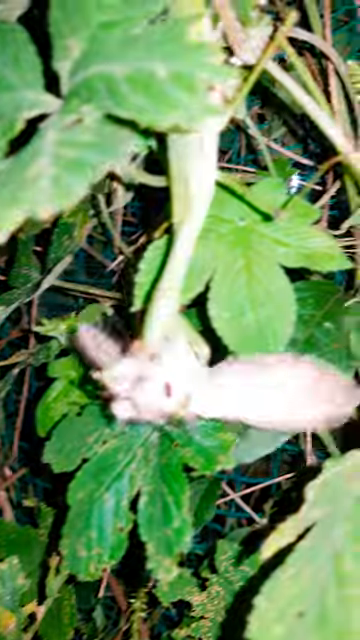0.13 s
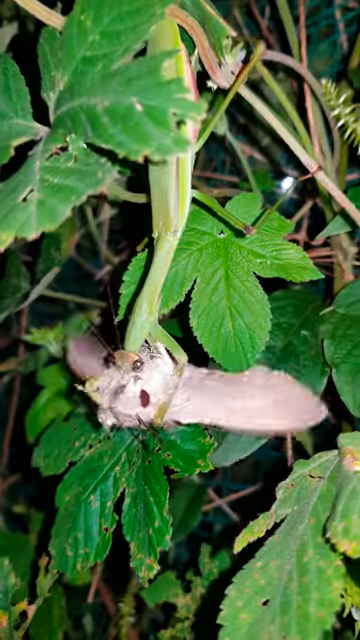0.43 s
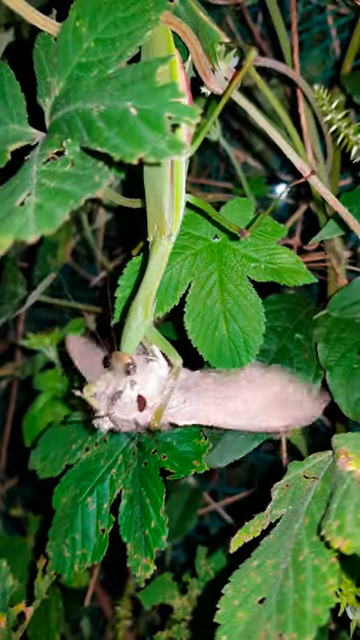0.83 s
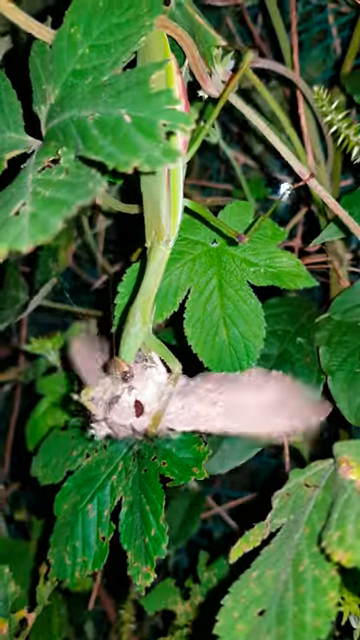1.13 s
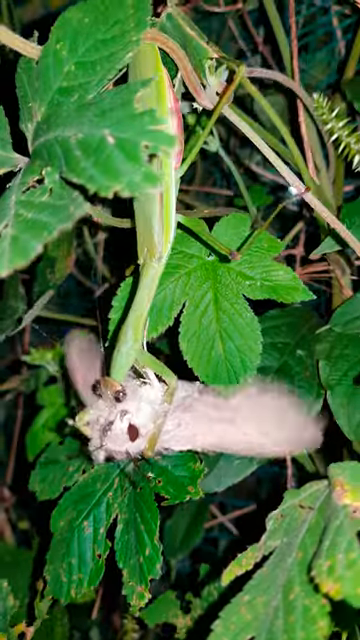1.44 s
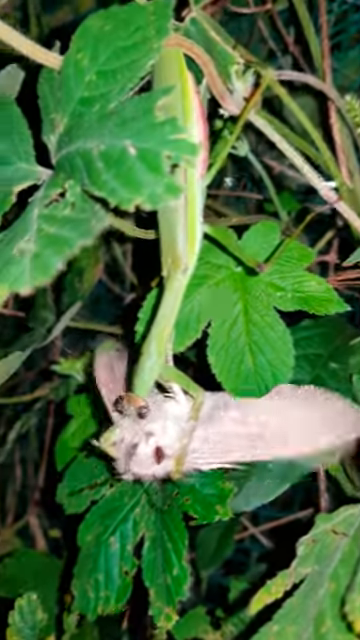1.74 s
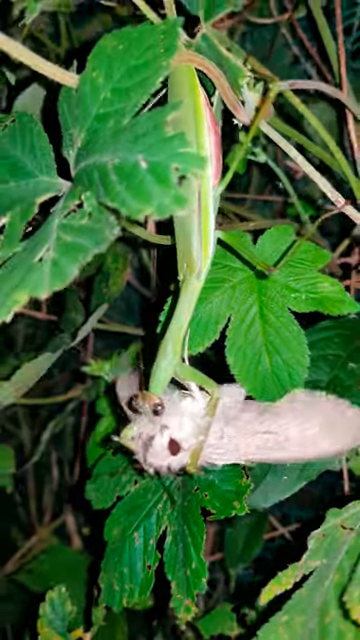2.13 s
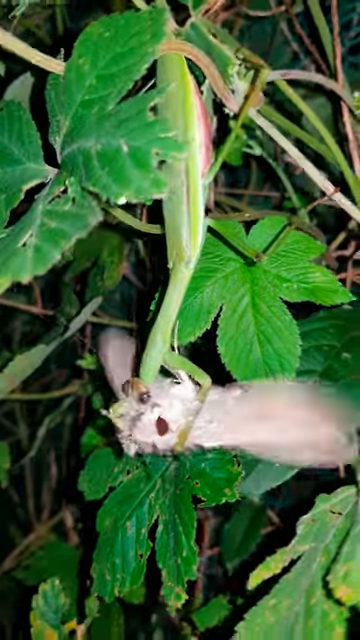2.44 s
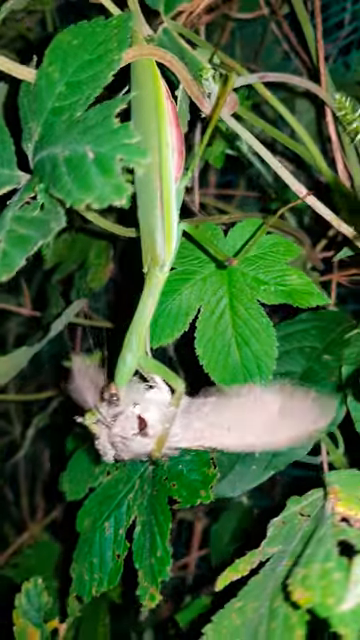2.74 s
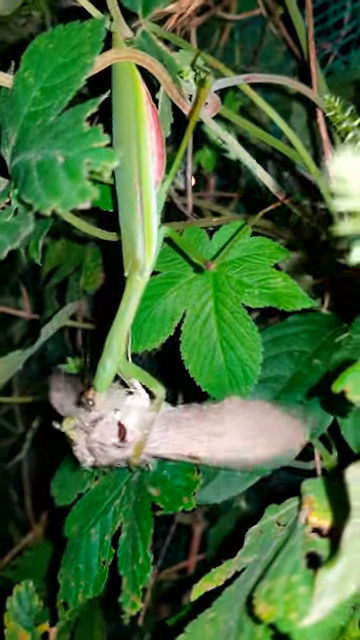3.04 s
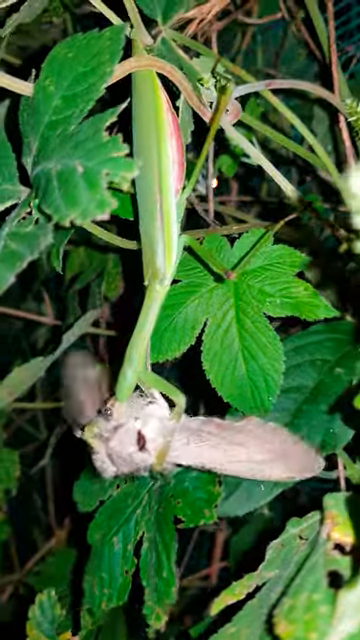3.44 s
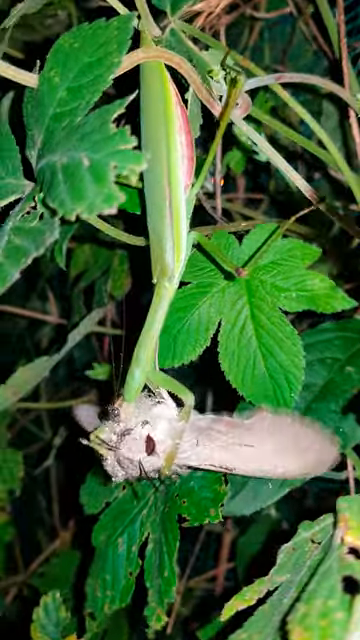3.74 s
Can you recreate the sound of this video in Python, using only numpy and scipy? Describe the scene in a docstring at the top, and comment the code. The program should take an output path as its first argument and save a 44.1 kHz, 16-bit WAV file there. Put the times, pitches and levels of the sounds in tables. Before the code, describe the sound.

A continuous bright insect chorus outdoors: a fast high trill, short chirps in groups, dry rasps and ticking, leaning slightly left with hiss on the right, over a far-off engine wavering in pitch and rising road rumble.

```python
"""Crickets trill and chirp in dense undergrowth at night, each wing stroke a short falling whistle scattered by leaves.
A field cricket slurs longer falling notes; bush crickets buzz, rasp, tick and hiss as shaped noise.
Behind them a far chorus shimmers as two bands of noise with sparse far chirps.
A distant engine, a stack of gliding overtones, rises and falls in pitch while its road noise slowly grows."""
import sys
import numpy as np
from scipy import signal
from scipy.fft import rfft, irfft, next_fast_len
from scipy.io import wavfile
from scipy.ndimage import map_coordinates

SR = 44100
rng = np.random.default_rng(int(sys.argv[2]) if len(sys.argv) > 2 else 0)


def unload_audio(sound):
    """Save the sound as a 16-bit wav file, at the path given as the first command line argument."""
    columns = np.transpose(np.atleast_2d(sound))
    # keep every value between -1 and 1, then stretch to whole-number steps
    steps = np.round(np.clip(columns, -1, 1) * 32767)
    wavfile.write(sys.argv[1], SR, steps.astype(np.int16))


N = 171990


def amp(db):
    """Decibels to gain."""
    return 10 ** (np.asarray(db) / 20)


def unit(x):
    """Scale to rms 1."""
    return x / np.sqrt(np.mean(x ** 2) + 1e-20)


def along(points, hz):
    """Read (Hz, value) points on a log frequency axis."""
    f, v = np.transpose(points)
    return np.interp(np.log(hz + 1), np.log(f + 1), v)


def curves(rows):
    """One value per sample for each column after the time."""
    s, *columns = np.transpose(rows)
    return [np.interp(np.arange(N) / SR, s, column) for column in columns]


def wobble(rate):
    """A smooth random curve, rate knots a second."""
    knots = np.linspace(0, N / SR * rate, 4000)
    coarse = map_coordinates(rng.standard_normal(2048), [knots], mode="wrap")
    return np.interp(np.arange(N), np.linspace(0, N, len(knots)), coarse)


def filtered(x, response):
    """Shape the spectrum of x with a response of frequency."""
    m = next_fast_len(N + SR // 4)
    return irfft(rfft(x, m) * response(np.fft.rfftfreq(m, 1 / SR)), m)[..., :N]


def pan(db):
    """Gains of left and right, the left louder by db."""
    return unit(amp([[db / 2], [-db / 2]]))


# How alike left and right are. Each row: frequency in Hz, correlation from 0 to 1 (no unit).
STEREO_LIKENESS = [(100, .99), (300, .95), (600, .93), (1000, .7), (2000, .05), (4000, 0)]


def coloured_noise(spectrum):
    """Stereo noise of rms 1: mid and side shares make it near mono in the bass and wide in the treble."""
    def turn(hz):
        return np.arccos(np.clip(along(STEREO_LIKENESS, hz), -1, 1)) / 2

    def mid_side_response(hz):
        return amp(along(spectrum, hz)) * [np.cos(turn(hz)), np.sin(turn(hz))]

    mid, side = filtered(rng.standard_normal((2, N)), mid_side_response)
    return unit(np.array([mid + side, mid - side]))


def add(track, s, sound):
    """Mix a sound in, centred on time s."""
    i = round(s * SR) - len(sound) // 2
    a, b = max(i, 0), min(i + len(sound), N)
    if b > a:
        track[a:b] += sound[a - i:b - i]


def bursts(rows, length_s):
    """A smooth swell for each (s, dB) row."""
    x = np.zeros(N)
    for s, db in rows:
        add(x, s, amp(db) * np.hanning(int(length_s * SR)))
    return x


def stroke(length_s, from_hz, to_hz, dwell=0):
    """One wing closure: a falling whistle that can dwell on the wing's resonance halfway down."""
    u = np.linspace(-1, 1, max(int(length_s * SR), 8))
    glide = (1 - dwell) * u + dwell * u ** 3
    hz = (from_hz + to_hz) / 2 + (to_hz - from_hz) / 2 * glide
    whistle = np.sin(2 * np.pi * (np.cumsum(hz) / SR + rng.random()))
    return np.cos(np.pi * u / 2) * whistle


LEAVES_T60_S, RIGHT_LAG_S = .13, .00003


def leaves(x, scatter_db):
    """Direct sound, slightly later on the right, plus a short foliage scatter: a slow fade through three noise tails."""
    t = np.arange(SR // 5) / SR
    tails = rng.standard_normal((3, 2, len(t))) * amp(-60 * t / LEAVES_T60_S)
    tails /= np.linalg.norm(tails, axis=-1, keepdims=True)
    place = np.linspace(0, len(tails) - 1, N)
    scatter = np.zeros((2, N))
    for k, tail in enumerate(tails):
        fade = np.sqrt(np.clip(1 - abs(place - k), 0, 1))
        scatter += signal.oaconvolve(x[None], tail, axes=1)[:, :N] * fade
    right = filtered(x, lambda hz: np.exp(-2j * np.pi * hz * RIGHT_LAG_S))
    direct = np.array([x, right])
    return (direct + amp(scatter_db) * scatter) / np.hypot(1, amp(scatter_db))


# Engine pitch. Each row: time in seconds, firing rate in Hz.
FIRING = [(.1, 50), (.3, 55), (.5, 62), (.8, 66), (1.25, 68), (1.55, 76), (1.78, 80), (2, 75), (2.3, 66),
          (2.55, 67), (2.9, 73), (3.28, 78), (3.5, 70), (3.7, 61), (3.9, 60)]
# Engine loudness before trim. Each row: time in seconds, level in dB.
ENGINE_LEVEL = [(.1, -58), (.4, -48), (.7, -44.5), (1.1, -45), (1.35, -43), (2, -43.5), (2.33, -39.5),
                (2.6, -44), (2.85, -44), (3.05, -40.5), (3.45, -44), (3.65, -41.5), (3.9, -44)]
# Lift of the upper overtones. Each row: time in seconds, relative level in dB.
UPPER_OVERTONES = [(.1, 4), (1.8, 3.5), (2.2, -4), (2.8, -2), (3.25, 2.5), (3.7, -5)]
# Fixed exhaust resonances. Each row: frequency in Hz, relative level in dB.
EXHAUST = [(80, -1.5), (120, -13), (160, -17), (205, -13), (290, -22), (375, -18), (470, -32), (560, -22),
           (630, -27), (720, -17), (780, -24), (875, -14.5), (940, -32), (1100, -45)]


def engine(count=14, order=6):
    """Overtones of the firing rate glide through fixed exhaust resonances; those above order have their own level."""
    (firing_hz,), (level_db,), (upper_db,) = curves(FIRING), curves(ENGINE_LEVEL), curves(UPPER_OVERTONES)
    phase = 2 * np.pi * np.cumsum(firing_hz) / SR + .05 * wobble(25)
    drone = np.zeros(N)
    for k in range(1, count + 1):
        overtone_db = along(EXHAUST, k * firing_hz) + upper_db * (k > order) + .5 * np.sqrt(k) * wobble(7)
        drone += amp(overtone_db) * unit(np.sin(k * phase + 2 * np.pi * rng.random()))
    return amp(level_db + .3) * drone


# Road loudness before trim. Each row: time in seconds, rumble in dB, roar in dB, tyres in dB.
ROAD = [(.1, -52, -57, -73), (.35, -50, -54, -69), (1.1, -49, -53, -64), (1.7, -45.5, -51.5, -61),
        (2.3, -44, -52, -57.5), (2.7, -44.5, -52, -57.5), (3.2, -43, -49.5, -55), (3.6, -41.5, -48, -53.5),
        (3.9, -40.5, -48.5, -53.5)]
# Colours of the three road layers. Each row: frequency in Hz, relative level in dB.
RUMBLE = [(15, -20), (30, -6), (60, -2), (110, 1), (160, -1), (225, 2), (300, -3), (385, -4), (480, -13),
          (800, -35)]
ROAR = [(250, -30), (450, -6), (560, -2), (700, 0), (860, 0), (980, -6), (1250, -10), (1500, -22),
        (2000, -45)]
TYRES = [(600, -25), (1100, 3), (1350, 1), (1750, -.5), (2250, -4), (3100, -11), (5000, -18), (10000, -35)]


def road_noise():
    """Three growing noise bands: low rumble, mid roar and fluttering tyres."""
    rumble_db, roar_db, tyre_db = curves(ROAD)
    rumble = amp(rumble_db + .8) * coloured_noise(RUMBLE)
    roar = amp(roar_db - .8) * coloured_noise(ROAR)
    tyres = amp(tyre_db + 1.5 + .8 * wobble(45)) * pan(db=1.6) * coloured_noise(TYRES)
    return rumble + roar + tyres


def vehicle():
    """A distant engine's drone in its road noise, a little to the left."""
    return pan(db=1.5) * (engine() + road_noise())


# Colours of the low and high chorus. Each row: frequency in Hz, relative level in dB.
FAR_LOW = [(2200, -45), (2480, -22), (2650, -6), (2850, -28), (3150, -32), (3600, -8), (4000, -7),
           (4400, -1), (4750, 0), (5150, -8), (5600, -19), (7000, -40)]
FAR_HIGH = [(4500, -45), (5700, -23), (6200, -13), (6650, -4), (7100, 0), (7450, -5), (7900, -11),
            (8500, -16), (9100, -23), (9700, -31), (11500, -35), (14000, -48)]


def far_chorus():
    """Countless distant crickets blur into two shimmering bands of noise."""
    low_db = -53.3 + 1.1 * wobble(12) + 1.3 * wobble(120)
    high_db = -50 + .4 * wobble(6) + 1.2 * wobble(200)
    low = amp(low_db) * pan(db=4.5) * coloured_noise(FAR_LOW)
    high = amp(high_db) * pan(db=5) * coloured_noise(FAR_HIGH)
    return low + high


# Short high buzzes. Each row: centre in seconds, level in dB before colouring.
BUZZES = [(.65, -66), (1.62, -66), (2.48, -62), (3.62, -62)]
# Dry rasps. Each row: centre in seconds, level in dB before trim.
RASPS = [(.23, -62), (.62, -62), (.94, -63), (1.205, -61), (1.29, -58), (1.67, -60), (1.975, -62),
         (2.225, -61), (2.28, -61), (2.582, -57), (2.92, -59), (3.245, -57), (3.52, -61), (3.78, -56)]
# Colours of buzz, rasp and the hiss on each side. Each row: frequency in Hz, relative level in dB.
BUZZ_COLOUR = [(9000, -30), (10400, -9), (11000, 0), (11500, -7), (12600, -28)]
RASP_COLOUR = [(7000, -40), (10000, -4), (11500, 0), (13500, -2), (16000, -8)]
HISS_RIGHT = [(8000, -40), (10500, -19), (12500, -8), (14200, -5.5), (15200, 1.5), (16000, 1)]
HISS_LEFT = [(9000, -15), (11000, -10), (13500, -15), (14400, -9), (15300, 0), (16000, 2)]
BUZZ_S, BUZZ_RATE_HZ, RASP_S, FLUTTER_HZ = .14, 280, .03, 152


def bush_crickets():
    """Noise pulsed into short buzzes, swelled into dry rasps and held as a hiss that flutters on the louder right."""
    t = np.arange(N) / SR
    teeth = unit((1 + np.cos(2 * np.pi * BUZZ_RATE_HZ * t + wobble(30))) ** 2)
    buzz = bursts(BUZZES, BUZZ_S) * teeth * coloured_noise(BUZZ_COLOUR)
    rasp = amp(2) * pan(db=-3.5) * bursts(RASPS, RASP_S) * coloured_noise(RASP_COLOUR)
    flutter = 1 + .3 * np.sin(2 * np.pi * FLUTTER_HZ * t)
    right = amp(-52.6 + 1.1 * wobble(22)) * flutter * coloured_noise(HISS_RIGHT)[1]
    left = amp(-67 + .8 * wobble(15)) * coloured_noise(HISS_LEFT)[0]
    return buzz + rasp + np.array([left, right])


# Swell of the ticking. Each row: time in seconds, level in dB before its wobble.
TICK_SWELL = [(1.7, -80), (1.95, -68), (2.3, -70), (2.9, -71), (3.3, -75)]
# Colour of the ticks. Each row: frequency in Hz, relative level in dB.
TICK_COLOUR = [(10500, -30), (12000, -5), (12600, 0), (13600, -5), (15000, -18)]
TICKS_PER_S = 29


def ticker():
    """A bush cricket ticks unevenly on the right: noise in narrow pulses that swells up, then slowly sinks."""
    level_db, = curves(TICK_SWELL)
    phase = np.pi * TICKS_PER_S * np.arange(N) / SR + .4 * wobble(10)
    ticks = unit(np.cos(phase) ** 6)
    return amp(level_db + 2.5 * wobble(9)) * ticks * pan(db=-9) * coloured_noise(TICK_COLOUR)


# Slurred notes. Each row: centre in seconds, level in dB before trim.
SLURS = [(.91, -55), (1.0, -51), (1.088, -49), (1.172, -49), (1.255, -50), (1.338, -50), (1.422, -51),
         (1.505, -52), (1.655, -56), (1.74, -56), (1.95, -57), (2.02, -53), (2.1, -55), (2.185, -53),
         (2.27, -53), (2.35, -53)]
SLUR_S, SLUR_FROM_HZ, SLUR_TO_HZ = .062, 4150, 3300


def field_cricket():
    """Runs of long falling notes, each one slow wing stroke, well scattered by the leaves."""
    x = np.zeros(N)
    for s, db in SLURS:
        add(x, s, amp(db) * stroke(SLUR_S, SLUR_FROM_HZ, SLUR_TO_HZ))
    return amp(-1.5) * pan(db=3) * leaves(x, scatter_db=4)


CHIRP_GAP_S, CHIRP_STROKE_S, CHIRP_RISE_DB = .0167, .011, 1.6


def add_chirp(track, s, hz, fall_hz, db, count=5):
    """Mix in one chirp, whose falling strokes grow louder towards the last; the last stroke is centred on time
    s."""
    for k in range(count):  # backwards from the last stroke
        one = stroke(CHIRP_STROKE_S, hz + fall_hz / 2, hz - fall_hz / 2)
        add(track, s - k * CHIRP_GAP_S, amp(db - CHIRP_RISE_DB * k) * one)


# Near chirps. Each row: last stroke in seconds, mid pitch in Hz, fall in Hz, last stroke's level in dB before trim.
CHIRPS = [(.33, 4600, 800, -48), (.62, 4600, 800, -49), (.95, 5000, 1400, -48), (1.108, 5000, 1400, -45),
          (1.40, 4650, 700, -43), (1.568, 4680, 700, -42.5), (1.734, 4680, 700, -40.5),
          (1.902, 4680, 700, -41.5), (2.18, 4400, 800, -44), (2.37, 4350, 800, -43), (2.55, 4350, 800, -43),
          (2.73, 4300, 800, -42), (2.90, 4330, 800, -42), (3.15, 4750, 1400, -44.5),
          (3.312, 4850, 1400, -45), (3.48, 4750, 1400, -44), (3.75, 4550, 900, -47)]
FAR_CHIRPS_PER_S, FAR_CHIRP_HZ, FAR_CHIRP_DB = 7, 4500, -56  # pitch and level are mid values


def chirpers():
    """A few near crickets chirp in turn; others of their kind answer at random further off, more scattered."""
    near, far = np.zeros(N), np.zeros(N)
    for row in CHIRPS:
        add_chirp(near, *row)
    for when, pitch, size in rng.random((int(FAR_CHIRPS_PER_S * N / SR), 3)):
        hz = FAR_CHIRP_HZ + 600 * (pitch - .5)
        add_chirp(far, when * N / SR, hz, 800, FAR_CHIRP_DB + 6 * (size - .5))
    return pan(db=5) * (amp(-1.3) * leaves(near, scatter_db=-5) + leaves(far, scatter_db=0))


def trill(song, drift, uneven_db, dwell):
    """An unbroken train of wing strokes, each a little off in time, pitch and level."""
    anchor_s, rate, length_s, from_hz, to_hz, db, pan_db, scatter_db = song
    x = np.zeros(N)
    for k in range(-8, int(N / SR * rate) + 1):  # the train is already running at the start
        late, sharp, loud = rng.standard_normal(3)
        tune = 1 + drift * sharp
        one = stroke(length_s, from_hz * tune, to_hz * tune, dwell)
        add(x, anchor_s + (k + .015 * late) / rate, amp(uneven_db * loud) * one)
    return amp(db) * pan(pan_db) * unit(leaves(x, scatter_db))


# The trillers' songs. Each row: time of one stroke in seconds, strokes per second, stroke length in seconds,
# start pitch in Hz, end pitch in Hz, level in dB before any swell, left over right in dB, scatter in dB.
LOUD_TRILL = (.125, 29.27, .024, 7560, 6400, -48.6, 4, -2)
LOW_TRILL = (.102, 31.28, .018, 2780, 2545, -59.2, 4, -2.5)
FAST_TRILL = (.103, 96.7, .0086, 9650, 7400, -58.3, 4.5, -8)
HOARSE_TRILL = (.1, 29, .016, 1920, 1600, -62, 4, 0)
# Swells of two songs. Each row: time in seconds, relative level in dB (the fast one is centred on its mean).
FAST_SWELL = [(0.1, -68), (0.24, -69), (0.51, -61), (2.45, -59), (2.99, -67), (3.54, -66), (3.58, -74),
              (3.74, -69), (3.9, -71)]
HOARSE_SWELL = [(1.8, -30), (2.05, -4), (2.3, 0), (2.52, 0), (2.65, -20)]


def trillers():
    """Four crickets trill by steady wing strokes; the fastest swells and fades, the hoarse one comes up only briefly."""
    (swell_db,), (hoarse_db,) = curves(FAST_SWELL), curves(HOARSE_SWELL)
    fast = amp(swell_db - swell_db.mean()) * trill(FAST_TRILL, drift=.002, uneven_db=.7, dwell=.75)
    loud = trill(LOUD_TRILL, drift=.005, uneven_db=.9, dwell=.1)
    low = trill(LOW_TRILL, drift=.005, uneven_db=1.8, dwell=.2)
    hoarse = amp(hoarse_db) * trill(HOARSE_TRILL, drift=.02, uneven_db=2.5, dwell=.1)
    return loud + low + fast + hoarse


def scene():
    """Insects close by and far, traffic far off."""
    insects = far_chorus() + bush_crickets() + ticker() + field_cricket() + chirpers() + trillers()
    opening_db, = curves([(.07, -2.8), (.5, 0)])  # (s, dB): the insects come up slightly at the start
    return vehicle() + amp(opening_db) * insects


START_S, TOP_HZ = .069, 15800


def record(dry):
    """Sound begins a moment in; nothing passes above the band limit."""
    begun = dry * (np.arange(N) / SR > START_S)
    return filtered(begun, lambda hz: hz < TOP_HZ)


dry = scene()
out = record(dry)
unload_audio(out)
```